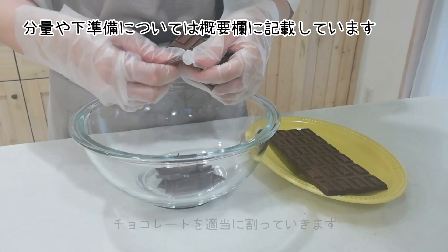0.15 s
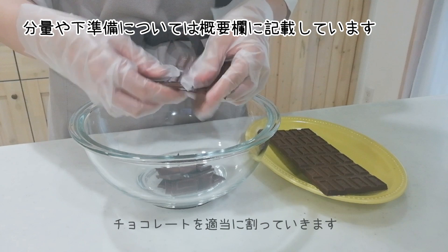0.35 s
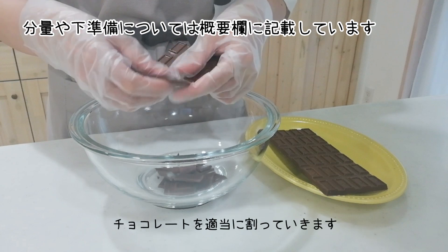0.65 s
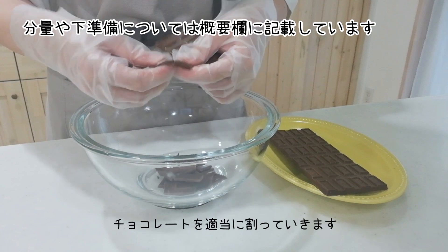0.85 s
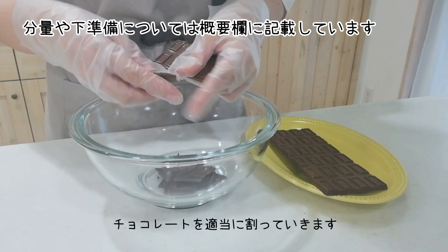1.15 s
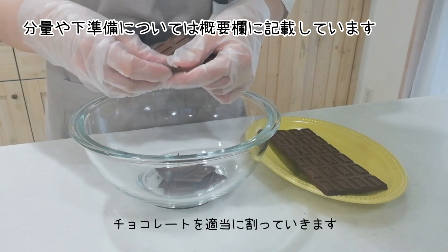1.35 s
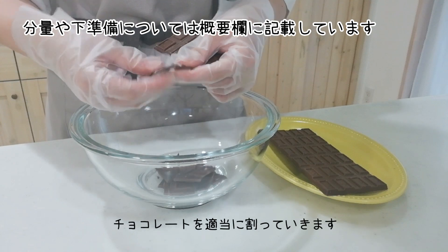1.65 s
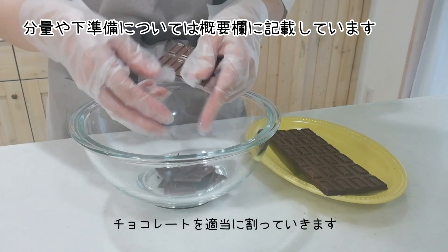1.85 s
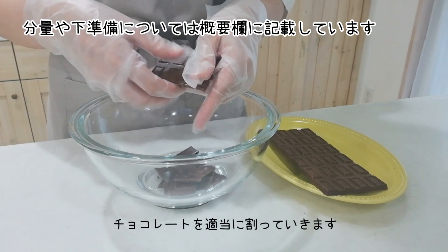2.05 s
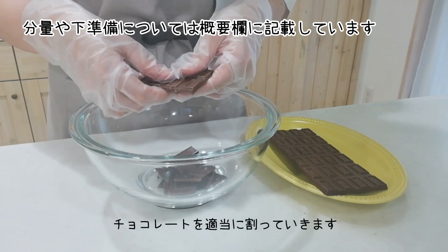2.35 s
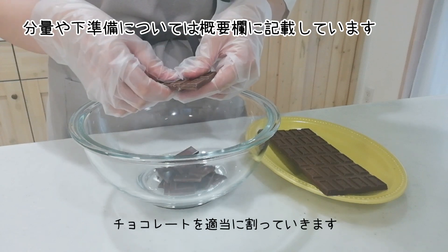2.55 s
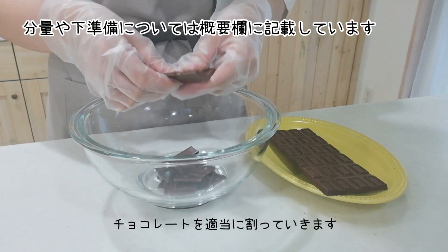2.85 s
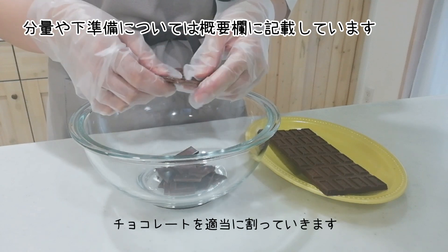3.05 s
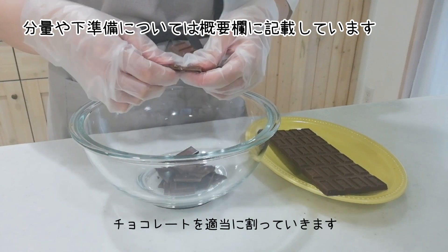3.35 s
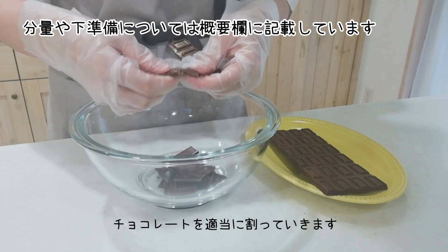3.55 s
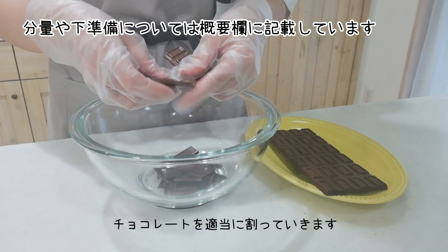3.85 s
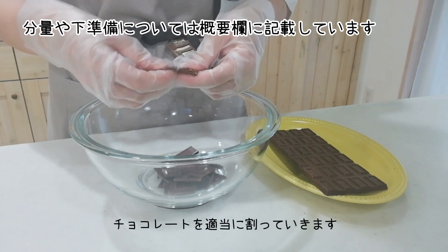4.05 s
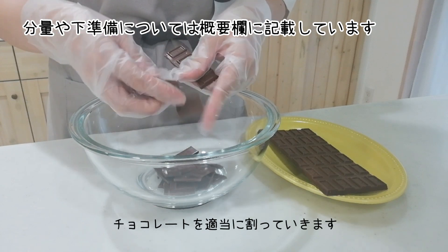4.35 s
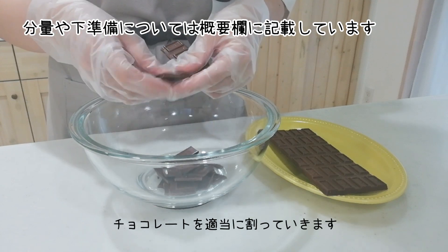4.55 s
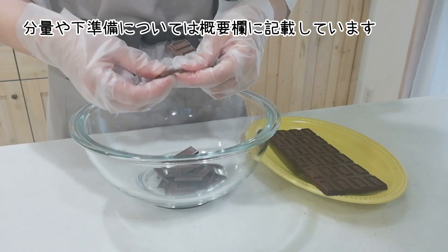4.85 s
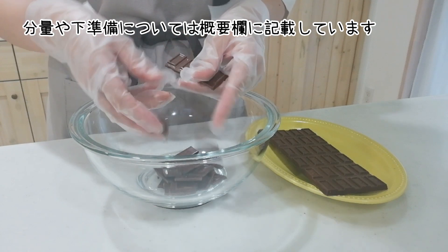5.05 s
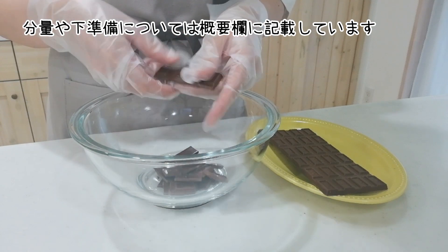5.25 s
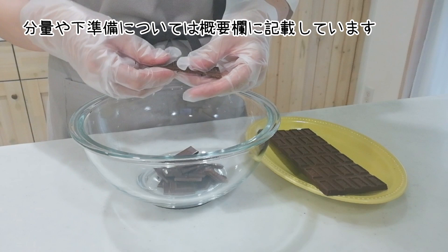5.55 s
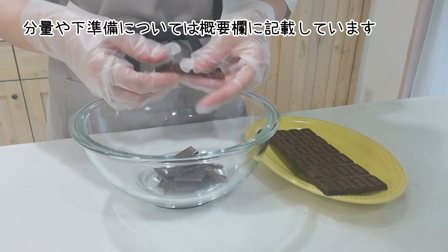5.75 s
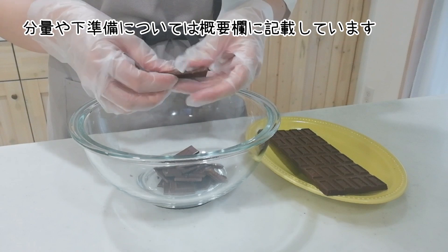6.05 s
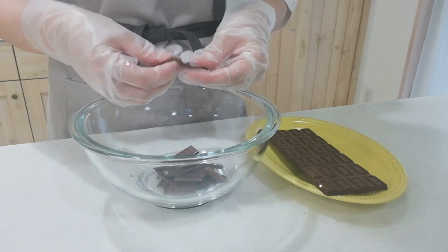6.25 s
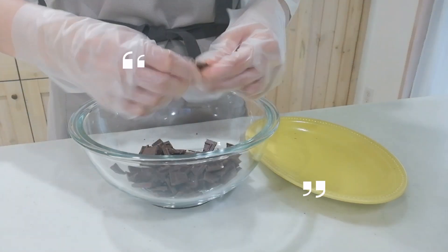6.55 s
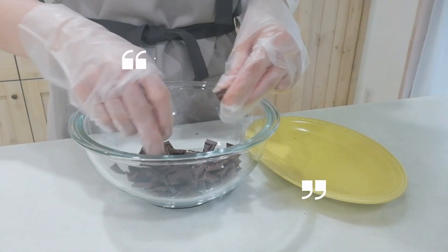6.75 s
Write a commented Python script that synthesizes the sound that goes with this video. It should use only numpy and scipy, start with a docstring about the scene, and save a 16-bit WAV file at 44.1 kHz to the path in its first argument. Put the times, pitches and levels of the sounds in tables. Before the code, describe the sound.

Sharp dry chocolate snaps amid constant crisp glove rustle, with fragments dropping onto a heap in a glass bowl in a small kitchen.

```python
"""At a kitchen counter, close to a two-port microphone, thin plastic gloves crinkle from the first moment.
Soon a chocolate bar snaps; its pieces fall into a glass bowl, clack on the heap, thud through the counter
and faintly ring the glass, while more breaks follow and a small hard room answers over a steady hum.
Near the end the ring and room tails stop and the level dips briefly; one more break, soft low bumps and
a last piece follow. Cracks and crinkles are shaped noise, knocks are struck resonances, rings are sines."""
import sys
import numpy as np
from scipy import signal
from scipy.fft import rfft, irfft, next_fast_len
from scipy.io import wavfile
from scipy.ndimage import map_coordinates

SR = 44100
rng = np.random.default_rng(int(sys.argv[2]) if len(sys.argv) > 2 else 0)


def waveform_to_disk(signal):
    """Save audio, clipped to [-1, 1], as 16-bit WAV at the path in sys.argv[1]."""
    frames = np.transpose(np.atleast_2d(signal))
    scaled = np.clip(frames, -1, 1) * 32767
    samples = np.round(scaled).astype(np.int16)
    wavfile.write(sys.argv[1], SR, samples)


N = 303695

# Levels in the tables are settings at the source, ahead of each layer's own trim.
# Breaks of the bar: (time [s], crack level [dB], knock level [dB], jolt level [dB], left-right [dB],
# splinter t60 [s], bar pitch [Hz])
BREAKS = [(0.2337, -29, -45.5, -58, -6, 0.49, 790), (0.3863, -49, -36.5, -69, -5, 0.18, 1440),
          (0.9386, -34, -47, -55.5, 1, 0.18, 1500), (1.642, -27, -44, -52, -2.5, 0.24, 1630),
          (1.9675, -32, -73.5, -79, 2, 0.23, 1500), (2.8837, -24, -44.5, -59, -3, 0.19, 826),
          (3.5699, -24, -40.5, -58, -0.5, 0.3, 2460), (4.1856, -27.5, -42.5, -51.5, 0, 0.28, 2270),
          (4.9075, -29, -51, -52.5, -7, 0.098, 2480), (5.7072, -26, -50.5, -53.5, 4, 0.37, 1460),
          (6.4952, -24, -40.5, -44.5, -6, 0.33, 1890)]
# Loud glove creases that pop: (time [s], thin-film level [dB], thick-fold level [dB], left-right [dB])
CREASE_POPS = [(.0024, -33, -50, -1), (.094, -37.5, -63, -11), (.1158, -40, -44, -6), (.1264, -47, -44, -7),
               (.137, -40, -44, -6), (.2206, -37.5, -39.5, -1), (.246, -38, -35, -4),
               (.2713, -50, -39.5, 1), (.3115, -50, -56, -8), (.406, -44, -41.5, -10.5),
               (.4204, -40, -47, -9), (.4668, -38, -43.5, 9), (.4768, -31, -46, -16.5),
               (.4914, -46, -40, -3), (.685, -32, -55, -10), (.7828, -35, -70, -16), (.8058, -27.5, -71, 3),
               (.821, -32, -71, -10), (.8412, -27, -70, 2), (.856, -36, -79, -14), (1.039, -48, -41.5, 2),
               (1.073, -29.5, -44.5, -1), (1.124, -30.5, -60, -1.5), (1.1607, -26.5, -48, 2),
               (1.198, -23, -60, 2), (1.2871, -26, -64, 0), (1.3113, -23.5, -67, 1), (1.4192, -35, -51, -9),
               (1.435, -37, -67, -13), (1.5405, -29.5, -45, -1.5), (1.7984, -37, -53, 3.5),
               (1.932, -36, -51, -4.5), (1.9747, -31, -42, -1.5), (1.99, -27.5, -34, -2),
               (2.157, -28, -61, -3), (2.2039, -18, -62, -2), (2.3116, -41, -63, -2),
               (2.376, -50, -39.5, 1), (2.4169, -32, -42.5, -2), (2.4733, -37, -74, -10),
               (2.6312, -41, -47.5, -2.5), (2.6722, -34.5, -62, 5), (2.818, -36, -57, -7),
               (2.9248, -54, -39, -2.5), (2.9438, -32, -41.5, 0), (3.0433, -33, -71, -5),
               (3.0678, -36, -37.5, -8), (3.1027, -32, -48, 2), (3.1909, -35.5, -50, 4),
               (3.3673, -27.5, -52, 1), (3.4413, -43, -44.5, -1), (3.5963, -30, -44, -7),
               (3.7289, -27.5, -65, 1), (3.7753, -28.5, -70, -4.5), (3.836, -29.5, -49, 2),
               (3.8875, -39, -42, -2.5), (3.9518, -34, -41.5, -4), (3.9674, -32, -40, -3.5),
               (4.0605, -32.5, -57, -9), (4.3263, -29, -52, -2), (4.3414, -30.5, -51, -5),
               (4.3791, -27, -70, 2), (4.4222, -28, -45, -3), (4.4583, -16, -61, 0), (4.5769, -28, -30, -2),
               (4.5843, -36, -31.5, -1), (4.6769, -28, -47, -3), (4.9781, -32.5, -72, 3),
               (5.249, -27, -39.5, 0), (5.3096, -36, -31.5, -11), (5.3177, -32, -38, 1),
               (5.398, -33, -58, 8), (5.4695, -31, -38.5, -3), (5.5573, -37.5, -45, -7),
               (5.6246, -37, -46.5, -2.5), (5.722, -30, -50, -17), (5.7674, -39.5, -50, -5),
               (5.8568, -23.5, -48, 0), (5.9054, -26, -61, 2), (5.9196, -19, -36, -1),
               (5.9302, -29, -43, 9), (6.0288, -28, -45, -5), (6.1176, -45, -47, 1.5),
               (6.2447, -26, -52, -3), (6.2939, -21, -50, -1), (6.5041, -25.5, -54, -6),
               (6.6815, -27.5, -69, 0), (6.7032, -27.5, -53, -2), (6.7908, -41, -67, -1.5),
               (6.8212, -26, -62, -2.5), (6.836, -36, -44, 0), (6.8464, -44, -32.5, -2),
               (6.855, -44, -38, 1)]
# Falling pieces: (boom over thud [dB], glass ring level [dB],
# contacts [(time [s], clack level [dB], thud level [dB]), ..])
FALLING_PIECES = [(-16, -80, [(.563, -31.5, -36), (.582, -37, -48), (.595, -40, -45.5), (.632, -44, -52),
                  (.668, -48, -53)]), (-3.5, -74, [(1.1952, -39.5, -41.5), (1.208, -42, -45.5),
                  (1.2225, -35.5, -45), (1.236, -43, -50.5), (1.27, -49, -53)]),
                  (-6.5, -67, [(1.975, -42, -44.5), (1.992, -36.5, -44), (2.037, -43, -45.5)]),
                  (-4, -67.5, [(2.051, -36, -49), (2.066, -32, -40.5), (2.082, -37, -44), (2.099, -39, -59),
                  (2.143, -50, -58), (2.12, -40.5, -60), (2.17, -47, -68), (2.189, -54, -63)]),
                  (-8, -74, [(3.887, -39, -42.5), (3.9035, -28.5, -41), (3.915, -49, -45.5),
                  (3.926, -60, -48.5), (3.987, -45, -47.5)]), (-6, -73, [(4.5765, -31.5, -39.5),
                  (4.602, -58, -46), (4.654, -58, -53)]), (-5.5, -70, [(5.213, -37, -40.5),
                  (5.2365, -29, -42), (5.246, -52, -40), (5.2655, -33.5, -42.5), (5.2985, -39, -62),
                  (5.311, -50, -50), (5.332, -58, -50.5)]), (-13.5, -70.5, [(6.083, -35, -41),
                  (6.0865, -28.5, -46.5), (6.097, -37, -47.5), (6.11, -40, -43.5), (6.152, -53, -59)]),
                  (-13, -68, [(6.844, -73, -51), (6.869, -70, -50.5)])]
# Resonances of the pieces heaped in the bowl: (frequency [Hz], width [Hz], level [dB])
HEAP_MODES = [(576, 24, 4.5), (824, 174, 3), (945, 59, 5.5), (1218, 203, 4.5), (1620, 420, -9),
              (2480, 830, -11.5)]
# Resonances of the counter: (frequency [Hz], width [Hz], level [dB])
COUNTER_MODES = [(192, 44, -5), (254.4, 29, 3.5), (323, 29, -3.5), (402, 16, -5.5), (454, 130, -1.5)]
# Ringing tones of the glass bowl: (frequency [Hz], relative level [dB], t60 [s])
GLASS_TONES = [(741, 0, .9), (748, -4, .7), (1922, -3, .7), (4700, -12, .5)]
# Resonances of the bar held in the fingers: (multiple of bar pitch [1], width per bar pitch [1], level [dB])
BAR_MODES = [(1, 0.297, 5), (1.6, 1, -10.5), (2.8, 0.29, -9)]
# Spectrum of the thin film: (frequency [Hz], relative density [dB per Hz])
FILM_SPECTRUM = [(2060, -31), (3500, -22), (4680, -24.5), (7210, -6.5), (10000, 2.5), (11200, -1.5),
                 (12100, -9.5), (14700, -17), (15400, -62), (16400, -66)]
# Spectrum of the thick folds: (frequency [Hz], relative density [dB per Hz])
FOLD_SPECTRUM = [(500, -15.5), (900, -4.5), (1500, -1), (2500, 1.5), (3500, 1.5), (5000, 4.5), (7000, 1.5),
                 (10000, -61)]
# Hum shared by both microphone ports: (frequency [Hz], relative density [dB per Hz])
SHARED_HUM = [(12, -20), (20, -1.5), (53, -4), (174, -1.5), (264, -6), (304, -11.5), (548, -21), (613, -29),
              (747, -11), (1140, -18.5), (7250, -22), (10100, -20), (13100, -31), (15000, -22),
              (16400, -80)]
# Hum that differs between the ports: (frequency [Hz], relative density [dB per Hz])
APART_HUM = [(12, -59), (20, -15), (217, -1), (1080, -2), (1510, -38), (1990, -6), (2290, -7), (3700, -4),
             (13100, -17), (15000, -37), (16400, -44)]
# Microphone ports: (frequency [Hz], phase lead of left [rad], left over right [dB])
PORT_BALANCE = [(100, 0.054, 1), (358, 0.66, -0.5), (608, 4.7, 5), (1220, 5.65, 2.5), (2530, 5.44, 0),
                (4800, 5.46, 2.5), (9100, 3.12, -3), (14600, 1.54, 0.5)]
# Small hard room: (frequency [Hz], t60 [s], left-right likeness [1])
ROOM_DECAY = [(60, 0.83, 0.88), (304, 0.44, 1), (990, 0.52, 0.51), (2840, 0.15, 0.57), (10200, 0.13, 0.079)]
# Resonances of the cabinet under the counter: (frequency [Hz], width [Hz], level [dB])
CABINET_MODES = [(67.5, 15, -17), (89, 12, -5), (127.5, 8.4, 0.5), (157, 36, -3.5)]
# Fuzzy, wavering tone in the hum: (frequency [Hz], width [Hz], mean level [dB])
DRONE_TONE = (194, 11.7, -72)
# Soft nudges of the counter: (time [s], peak level [dB], pitch [Hz], length [s])
SOFT_BUMPS = [(2.365, -56, 192, 0.052), (6.588, -47.5, 218.5, 0.031), (6.602, -42.5, 163, 0.026),
              (6.64, -56, 202.5, 0.032)]
# Finger movements, one rustle each: (time of peak [s], level [dB], swell over 20 dB [s], fade over 20 dB [s])
FINGER_MOVES = [(0.0, -43, .05, 0.11), (.128, -46, 0.068, 0.089), (.41, -51, 0.13, .2),
                (.469, -53.5, 0.56, 0.62), (.796, -48, 0.56, 0.4), (.96, -50.5, 0.02, 1.0),
                (1.213, -47.5, 0.017, 0.068), (1.313, -47, 0.055, 0.53), (1.809, -42.5, 0.054, 0.076),
                (1.984, -38, 0.077, 0.12), (2.205, -40.5, .12, 0.17), (2.32, -47.5, 0.18, 0.31),
                (2.49, -54.5, 0.15, 0.12), (2.826, -59.5, 0.011, 0.034), (2.93, -44.5, 0.032, 0.14),
                (3.071, -41.5, 0.17, 0.18), (3.378, -47.5, .2, 0.044), (3.45, -60, .1, .17),
                (3.728, -48, 0.14, 0.32), (3.903, -42, 0.017, 0.24), (4.079, -47.5, 0.098, 0.16),
                (4.33, -46, 0.021, 0.58), (4.468, -51.5, 0.13, 0.13), (4.586, -37, 0.022, 0.18),
                (4.75, -53.5, 0.23, 0.1), (5.058, -48.5, .09, 0.22), (5.216, -45, 0.058, 0.52),
                (5.316, -59, 0.017, .3), (5.48, -50.5, 0.16, 0.21), (5.855, -49, 0.045, 0.13),
                (5.921, -40, 0.04, 0.07), (6.037, -40.5, 0.034, 0.16), (6.12, -49.5, 0.052, 0.34),
                (6.248, -44.5, 0.23, 0.091), (6.695, -49, 0.13, 0.46), (6.834, -53, 0.12, 0.13)]

HUM_DB = -65.5  # shared part of the hum
CUT_S = 6.345  # the glass ring and room tails stop here
TOP_HZ = 16300  # upper band limit of the microphone
REST_DB = -84  # gloves held still
HUSH_S, HUSH_DB = 0.068, -11  # the fingers tense and go quiet just before a break
RECOIL_DB, RECOIL_S = -21, 0.027  # they jerk after it: rustle re crack setting, fade over 20 dB
FOLDS_DB, FOLDS_WANDER_DB = -11, 2  # thick folds under the thin film
POP_T60, FOLD_T60 = 0.0068, 0.021  # s; a thick fold gives way more slowly
SMALL_POP_DB, SMALL_POP_SPREAD_DB = 0.5, 5  # small pops over the rustle
CONTACT_S = 0.00036  # how long chocolate stays pressed on chocolate in a blow
CLATTER, ROCKING = 0.009, 0.052  # after-rattle on the heap and in the counter, as a share of the blow


def snaps():
    """The break is a sharp crack with splintering after it; it knocks the bar and jolts the counter."""
    crack, knock, jolt = np.zeros((3, 2, N))
    rise = np.minimum(np.arange(int(.2 * SR)) / (0.00072 * SR), 1)  # the crack needs a moment to run
    for s, crack_db, knock_db, jolt_db, pan_db, splinter_t60, bar_hz in BREAKS:
        splintering = burst(0.035, .2) + 0.16 * burst(splinter_t60, .2)
        add(crack, s, amp(crack_db - 4.5) * rise * splintering, pan_db)
        bar = body([(bar_hz * ratio, bar_hz * width, db) for ratio, width, db in BAR_MODES])
        blow = 0.012 * burst(0.067, .07)[0]  # the halves grind past each other
        blow[[0, 40]] = 1, rng.uniform(-0.81, 0.49)  # the crack runs through in two steps
        add(knock, s, amp(knock_db + 8.0) * filtered(blow, bar))
        add(jolt, s + 0.00066, amp([jolt_db + 11.0]))  # a single impulse
    wide = lambda hz: 0.92 * colour(FILM_SPECTRUM)(hz) + 0.29 * colour(FOLD_SPECTRUM)(hz)
    return filtered(crack, wide) + knock + filtered(jolt, body([(278, 154, 0)]))


def drops():
    """Each contact clacks on the heap, rattles the counter for a moment and rings the glass at new strengths."""
    clack, thud, boom, ring = np.zeros((4, 2, N))
    t = np.arange(SR) / SR
    press = np.sin(np.pi * np.clip(t[1:200] / CONTACT_S, 0, 1)) ** 2
    contacts = [(*row, boom_db, ring_db) for boom_db, ring_db, rows in FALLING_PIECES for row in rows]
    for s, clack_db, thud_db, boom_db, ring_db in contacts:
        rattle = burst(0.18, .25)[0]  # the piece rocks to rest
        blow = lambda share: np.convolve(np.r_[1, share * rattle], press / press.sum())
        add(clack, s, amp(clack_db + 6.0) * blow(CLATTER))
        add(thud, s, amp(thud_db + 12.5) * blow(ROCKING))
        add(boom, s, amp(thud_db + boom_db + 3.5) * blow(ROCKING))
        for hz, db, t60 in GLASS_TONES:
            decay = amp(ring_db + db + rng.normal(0, 5.7) - 60 * t / t60)
            add(ring, s, decay * np.sin(2 * np.pi * hz * t))
    heavy = lambda hz: 1 / (1 + 1j * hz / 650) ** 2  # the bowl's mass keeps the treble out of the counter
    counter = filtered(thud, body(COUNTER_MODES, in_step=True))
    cabinet = filtered(boom, body(CABINET_MODES, in_step=True))
    return filtered(clack, body(HEAP_MODES)) - filtered(counter + cabinet, heavy), ring


def gloves():
    """A running crinkle in two sizes of fold, flipping facets, and single creases that pop."""
    level = hands()
    fine = crinkle(count=2500, spread_db=7, t60=0.016, smooth=0.99, clump_db=2.5)
    coarse = crinkle(count=900, spread_db=-2.0, t60=0.054, smooth=1.0, clump_db=1.5)
    thin = level * fine
    fold_gain = amp(FOLDS_DB + FOLDS_WANDER_DB * wobble(count=40))
    thick = level * fold_gain * (0.39 * fine + 0.98 * coarse)
    # small pops at random times follow the level of the rustle
    when = rng.random(70)
    size, fold, side = rng.standard_normal((70, 3)).T
    rustle_db = 20 * np.log10(level[(when * N).astype(int)])
    small_db = rustle_db + SMALL_POP_DB + SMALL_POP_SPREAD_DB * np.minimum(size, 1)
    small = zip(when * N / SR, small_db, small_db - 17 + 6 * fold, 4 * side - 3)
    for s, thin_db, thick_db, pan_db in [*CREASE_POPS, *small]:
        add(thin, s, amp(thin_db) * burst(POP_T60, .05), pan_db)
        add(thick, s, amp(thick_db) * burst(FOLD_T60, .05), pan_db)
    facets = level * amp(-15) * ticks(count=1500, spread_db=3, centre_hz=8830)
    return filtered(thin, colour(FILM_SPECTRUM)) + filtered(thick, colour(FOLD_SPECTRUM)) + facets


def hands():
    """Level of the rustle: every movement swells and fades, every break hushes the fingers and then jerks them."""
    t = np.arange(N) / SR
    swelling = lambda s, db, swell, fade: amp(db - 20 * np.maximum((s - t) / swell, (t - s) / fade))
    level = amp(REST_DB) + np.zeros(N)
    for s, db, swell, fade in FINGER_MOVES:
        same_side = (t < CUT_S) == (s < CUT_S)  # no movement carries across the cut
        level += swelling(s, db, swell, fade) * same_side
    for s, *_ in BREAKS:
        level *= amp(HUSH_DB * np.clip(1 - (s - t) / HUSH_S, 0, 1) * (t < s))
    for s, crack_db, *_ in BREAKS:
        level += swelling(s + 0.0025, crack_db + RECOIL_DB, .005, RECOIL_S)
    return level


def crinkle(count, spread_db, t60, smooth, clump_db):
    """Tiny creases, each a puff of noise with its own size and side, on a smooth rustle."""
    s, size, side = rng.random((count, 3)).T
    gain = amp(-spread_db * np.log(size + 0.034))
    at = (s * N).astype(int)
    creases = np.array([np.bincount(at, gain * amp(k * 16.0 * (side - .5)), N) for k in (1, -1)])
    creases = signal.lfilter([1], [1, -amp(-60 / (t60 * SR))], creases)  # each crease dies away
    clumps = amp(clump_db * (wobble(count=600) + wobble(count=150)))  # fingers move in jerks
    noise = burst(np.inf, (N + .5) / SR, alike=0.56)
    return unit(clumps * (unit(creases) + smooth) * noise)


def ticks(count, spread_db, centre_hz):
    """Facets of the film that flip: a few cycles each, at a pitch and side of their own."""
    s, size, side, cycles = rng.random((count, 4)).T[..., None]
    hz = np.clip(centre_hz * amp(3.47 * rng.standard_normal((count, 1))), 1500, 14000)
    n = np.arange(128)
    decay_db = -60 * n / SR * hz / (6 + 14 * cycles)  # 60 dB in 6 to 20 cycles
    grain = amp(-spread_db * np.log(size + 0.013) + decay_db) * np.sin(2 * np.pi * hz * n / SR)
    lag = np.round(6 * (side - .5))  # samples
    at = lambda k: np.clip(s * N + n + k * lag, 0, N - 1).astype(int).ravel()
    panned = lambda k: (grain * amp(k * (1.5 * side - 1.5))).ravel()
    return unit(np.array([np.bincount(at(k), panned(k), N) for k in (1, -1)]))


def bumps():
    """Soft contacts: a short low swell without a click."""
    out = np.zeros((2, N))
    for s, db, hz, length in SOFT_BUMPS:
        t = np.arange(int(length * SR)) / SR
        add(out, s, amp(db) * np.sin(np.pi * t / length) * np.sin(2 * np.pi * hz * t))
    return out


def room(x):
    """Tails that die by frequency, drawn anew every quarter second; alike at both ports only in the bass."""
    out, step = np.zeros((2, N + SR)), SR // 4
    for start in range(0, N, step):
        hz, t, z = signal.stft(rng.standard_normal((2, SR // 2)), SR, nperseg=512)
        turn = np.arccos(np.clip(along(ROOM_DECAY, hz, axis=2), 0, 1))[:, None] / 2
        z = np.array([z[0] * np.cos(turn) + k * z[1] * np.sin(turn) for k in (1, -1)])
        t60 = along(ROOM_DECAY, hz)[:, None]
        z = z * amp(-60 * t / t60) / np.sqrt(t60)  # long tails start lower
        tail = signal.istft(z, SR, nperseg=512)[1]
        send = x[:, start:start + step].mean(0)[None]
        wet = signal.fftconvolve(send, tail / np.linalg.norm(tail[0]), axes=1)
        out[:, start + 150:][:, :wet.shape[1]] += wet  # the answer comes 150 samples late
    return out[:, :N]


def hum():
    """Steady kitchen rumble and microphone hiss: noise shared and apart at the ports, and a wavering drone."""
    alike, apart, fuzz = rng.standard_normal((3, N))
    hz, width, db = DRONE_TONE
    drone = amp(db + 1.9 * wobble(count=30)) * unit(filtered(fuzz, body([(hz, width, 0)])))
    alike = amp(HUM_DB) * unit(filtered(alike, colour(SHARED_HUM))) + drone
    apart = amp(HUM_DB - 3.0) * unit(filtered(apart, colour(APART_HUM)))
    return np.array([alike + apart, alike - apart])


def amp(db):
    """Decibels to gain."""
    return 10 ** (np.asarray(db) / 20)


def unit(x):
    """Scaled to rms 1."""
    return x / np.sqrt(np.mean(x ** 2) + 1e-20)


def along(points, hz, axis=1):
    """One column of (frequency [Hz], value, ..) points on a log axis."""
    p = np.transpose(points)
    return np.interp(np.log(hz + 1), np.log(p[0] + 1), p[axis])


def filtered(x, response):
    """x times a complex response of frequency."""
    m = next_fast_len(x.shape[-1] + SR // 4)
    return irfft(rfft(x, m) * response(np.fft.rfftfreq(m, 1 / SR)), m)[..., :x.shape[-1]]


def colour(points):
    """A smooth spectrum that passes white noise at equal power."""
    return lambda hz: unit(amp(along(points, hz)))


def body(modes, in_step=False):
    """Resonances whose answer to a unit blow peaks at 1; in step, they all start with one push the same way."""
    def raw(f):
        total = 0
        for k, (centre, width, db) in enumerate(modes):
            sign = 1 if in_step else (-1) ** k
            total = total + sign * amp(db) * 1j * f * width / (centre * centre - f * f + 1j * f * width)
        return total
    top = np.abs(irfft(raw(np.fft.rfftfreq(SR, 1 / SR)))).max()
    return lambda f: raw(f) / top


def add(track, s, sound, pan_db=0.):
    """Mix a sound into both channels at time s."""
    part = track[:, round(s * SR):][:, :sound.shape[-1]]
    part += amp([[pan_db / 2], [-pan_db / 2]]) * sound[..., :part.shape[1]]


def burst(t60, length, alike=0.62):
    """Dying noise, partly different at the two ports."""
    t = np.arange(int(length * SR)) / SR
    both, left, right = rng.standard_normal((3, len(t)))
    return amp(-60 * t / t60) * (alike * both + np.sqrt(1 - alike ** 2) * np.array([left, right]))


def wobble(count):
    """A smooth random curve through count knots."""
    return map_coordinates(rng.standard_normal(count), [np.linspace(0, count - 1, N)])


def scene():
    """Near sounds and their room reach the two microphone ports; the hum lies beneath."""
    knocks, ring = drops()
    film = gloves()
    solid = snaps() + knocks + bumps()
    send = amp(-6.0) * film + amp(-4.5) * solid
    before = np.arange(N) < CUT_S * SR
    wet = before * (ring + room(send * before)) + room(send * ~before)  # the glass rings only before the cut
    side = np.array([[.5], [-.5]])
    level = lambda hz: amp(side * along(PORT_BALANCE, hz, axis=2))
    phase = lambda hz: np.exp(1j * side * along(PORT_BALANCE, hz))
    return filtered(film + solid + wet, lambda hz: level(hz) * phase(hz)) + hum()


def record(dry):
    """The level dips briefly just after the tails stop; the microphone keeps nothing above its band limit."""
    dip = np.clip(np.abs(np.arange(N) / SR - CUT_S - .003) / 0.015, .4, 1)
    return filtered(dip * dry, lambda hz: hz < TOP_HZ)


dry = scene()
out = record(dry)
waveform_to_disk(out)
```